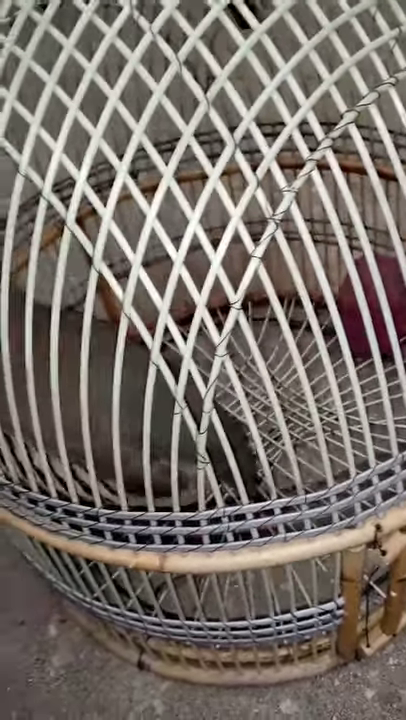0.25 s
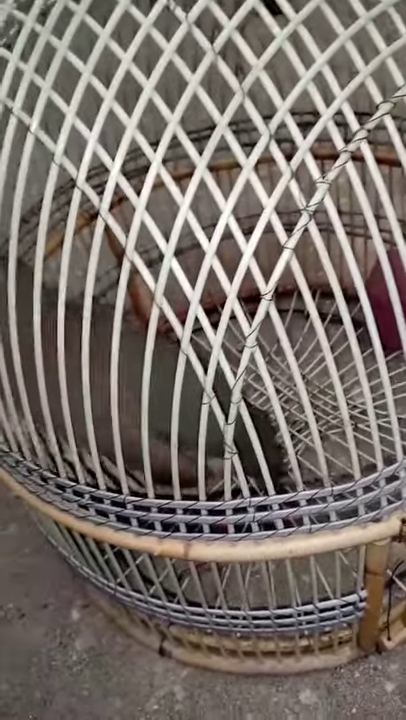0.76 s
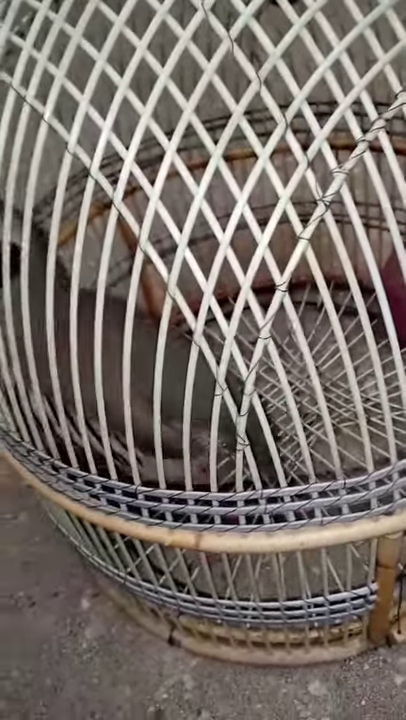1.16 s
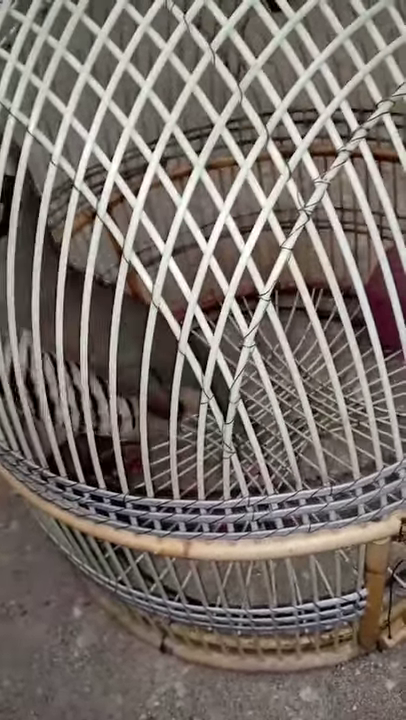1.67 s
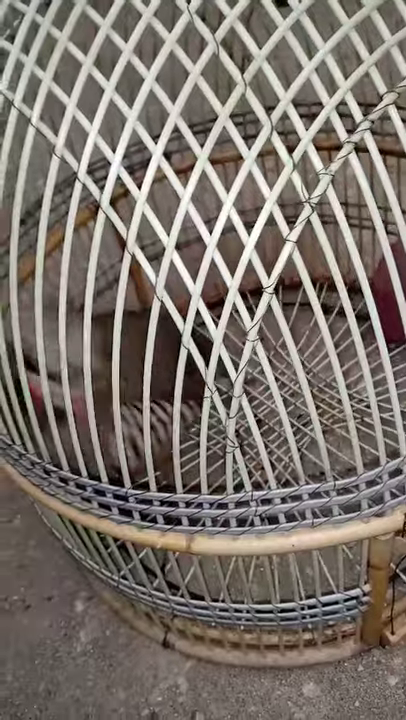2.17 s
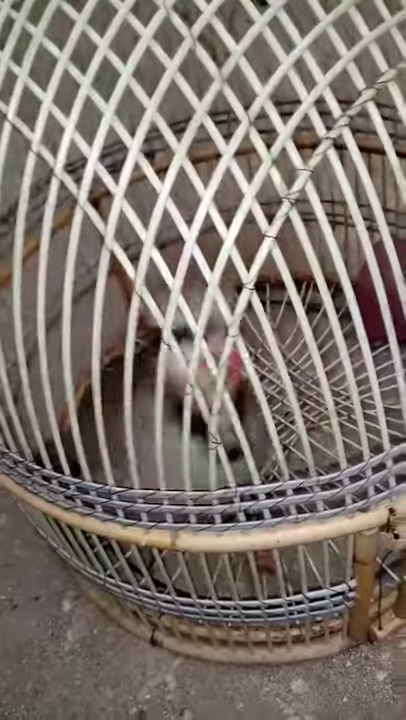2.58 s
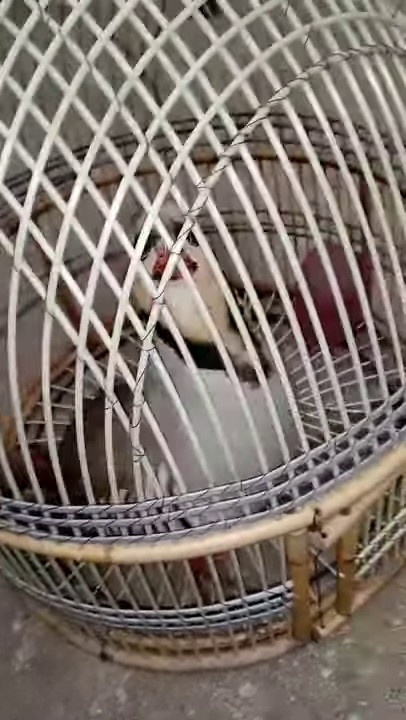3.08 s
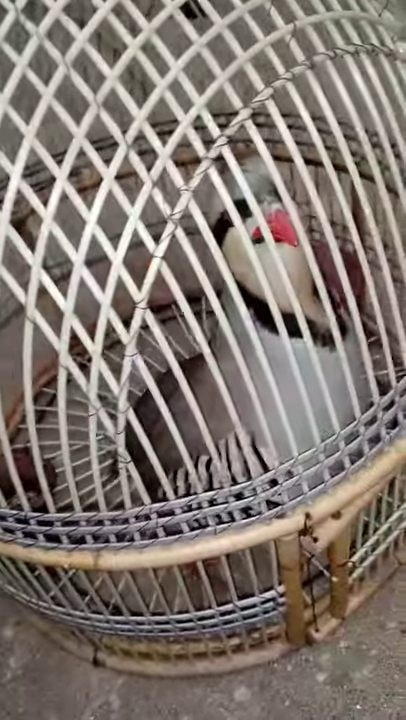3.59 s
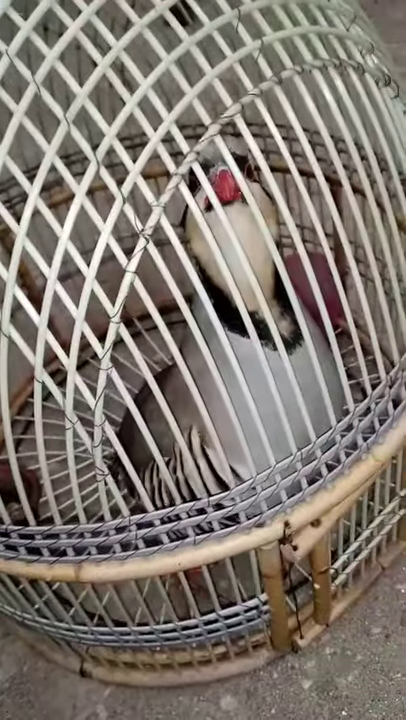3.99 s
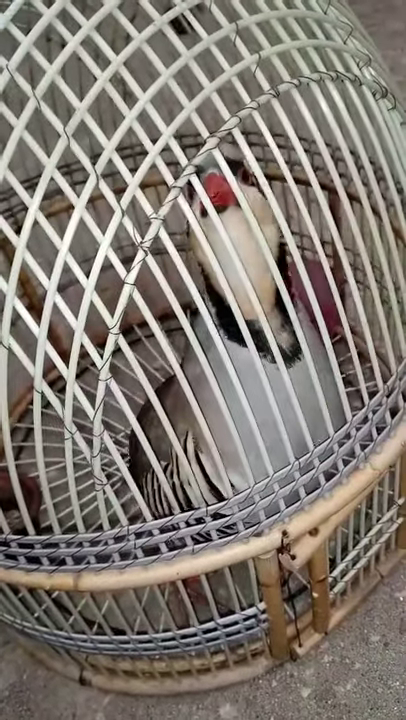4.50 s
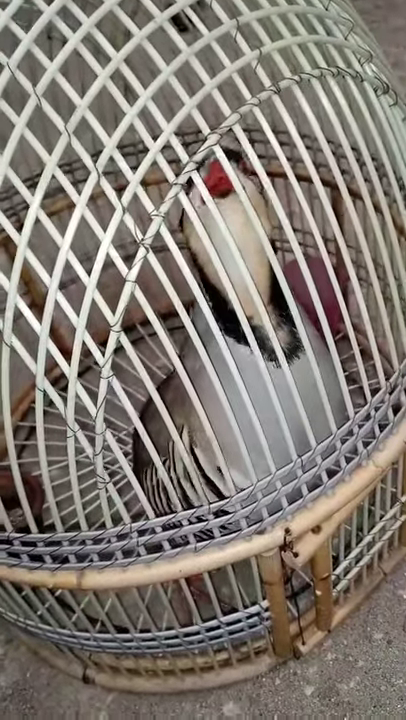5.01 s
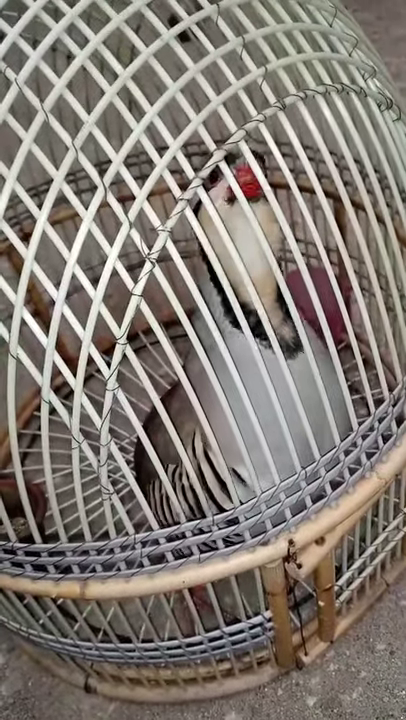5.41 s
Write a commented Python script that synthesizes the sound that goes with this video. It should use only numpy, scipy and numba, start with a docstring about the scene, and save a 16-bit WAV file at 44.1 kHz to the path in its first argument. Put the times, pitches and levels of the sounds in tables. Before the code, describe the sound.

A partridge in a wicker cage calls close to the microphone. Quick hoarse notes and piercing gliding squeals come first, with a short lull, then build into loud, bright paired cackles. After about three and a half seconds the calls become lower, more closed and throaty, in steady groups of two to four clucks with small gulps. Faint ticks on wicker, short wall echoes and a very quiet outdoor hum.

```python
"""An earlier call's echo dies away as a caged partridge begins runs of short hoarse notes, its beak wide.
Its voice membranes pulse at a restless rate through throat and beak resonances; among the notes, above all
the early ones, stand clear squeals: gliding tones with overtones. Noise bursts tick and rustle on the wicker.
Later the beak half shuts, and falling low tones, the gulps, close more of the notes. Decaying noise supplies
the wall echoes; filtered noise gives a background hum and murmur that sink in some long gaps between calls."""
import sys
import numpy as np
from scipy import signal
from scipy.fft import rfft, irfft
from scipy.io import wavfile
from scipy.ndimage import uniform_filter1d
from numba import njit

SR = 44100
rng = np.random.default_rng(int(sys.argv[2]) if len(sys.argv) > 2 else 0)


def to_wav(s):
    """Save 16-bit WAV."""
    ch = np.atleast_2d(s).T  # columns
    pcm = np.round(np.clip(ch, -1, 1) * 32767)  # PCM
    wavfile.write(sys.argv[1], SR, pcm.astype(np.int16))


N = 249165


def from_db(db):
    """Logarithmic level: decibels become an amplitude gain."""
    return 10 ** (np.asarray(db) / 20)


def rms_one(x):
    """Power normalisation: scale to unit rms."""
    return x / np.sqrt(np.mean(x ** 2) + 1e-20)


def colour(x, points):
    """Spectral shaping: weight each frequency by a curve through (hz, level_db) points."""
    hz, db = np.transpose(points)
    log_hz = np.log(np.maximum(np.arange(N // 2 + 1) * SR / N, 1))
    gain = from_db(np.interp(log_hz, np.log(hz), db, left=-90, right=-90))
    return irfft(rfft(x) * gain, N)


def drift(rate_hz):
    """Random fluctuation of unit rms: noise twice through a one-pole low-pass."""
    r = np.exp(-2 * np.pi * rate_hz / SR)
    return rms_one(signal.lfilter([1], [1, -2 * r, r * r], rng.standard_normal(N)))


def high_pass(x, hz):
    """Second-order high-pass filtering."""
    return signal.sosfilt(signal.butter(2, hz, "high", fs=SR, output="sos"), x)


def resonance(x, hz, width_hz):
    """Fixed resonance: a two-pole band-pass with gain 1 at its peak."""
    r = np.exp(-np.pi * width_hz / SR)
    zeros = np.array([1, 0, -1]) * (1 - r * r) / 2
    poles = [1, -2 * r * np.cos(2 * np.pi * hz / SR), r * r]
    return signal.lfilter(zeros, poles, x)


@njit
def gliding_filter(x, cosine, r):
    """Time-varying resonance: the pole angle moves sample by sample."""
    y = np.zeros(len(x))
    for i in range(2, len(x)):
        driven = (1 - r * r) / 2 * (x[i] - x[i - 2])
        y[i] = driven + 2 * r * cosine[i] * y[i - 1] - r * r * y[i - 2]
    return y


def gliding_resonance(x, hz, width_hz):
    """Moving resonance: a band-pass of constant width follows hz, scaled to unit rms."""
    return rms_one(gliding_filter(x, np.cos(2 * np.pi * hz / SR), np.exp(-np.pi * width_hz / SR)))


def evened(x):
    """Level equalisation over 7 ms, so that only the breath shapes a note."""
    return x / np.sqrt(uniform_filter1d(x ** 2, size=round(.007 * SR)) + 1e-12)


BUZZ_HZ, BUZZ_DEPTH = 244.1, 0.27   # a slower, uneven beat makes the flutter rasp; centre rate


def membranes(pitch_hz):
    """Irregular self-oscillation: one pulse a cycle, alternate pulses weakening by turns (period doubling)."""
    wander, jitter, uneven_db, breath = .09, .04, 2.2, .27
    phase = np.cumsum(pitch_hz * np.exp(wander * drift(75.0) + jitter * drift(500.0)) / SR)   # cycles
    cycle = np.floor(phase)
    closing = np.diff(cycle, prepend=0)
    halving = np.clip(0.32 + 2.4 * drift(41.0), 0, 1) * (cycle % 2)
    pulses = closing * (1 - halving) * from_db(uneven_db * np.clip(rng.standard_normal(N), -3, 1.2))
    buzz_phase = 2 * np.pi * np.cumsum(BUZZ_HZ * np.exp(.3 * drift(30.15))) / SR
    pulses = pulses * (1 + BUZZ_DEPTH * np.cos(buzz_phase))
    spray = rng.standard_normal(N) * (1 + np.cos(2 * np.pi * phase))   # breath noise escapes once a cycle
    return rms_one(pulses - pulses.mean()) + breath * spray


# throat resonances: hz, width_hz (before narrowing by 0.79), level_db
THROAT_RESONANCES = [(397, 830, -10), (755, 582, 1), (1279, 350, -1), (1521, 187, -1)]


def throat_sound(source, flutter_hz):
    """Cavity resonance: parallel modes of alternating sign, a side-branch loss and a mode tuned to the flutter."""
    throat = np.zeros(N)
    for k, (hz, width_hz, db) in enumerate(THROAT_RESONANCES):
        width_hz = 0.79 * width_hz
        mode = resonance(resonance(source, hz, width_hz), hz, width_hz)
        throat += from_db(db) * (-1) ** k * mode
    throat = throat - 0.93 * resonance(throat, 517, 400)   # a side pocket swallows this band
    return rms_one(throat) + 0.48 * gliding_resonance(throat, flutter_hz, 200)


# radiation spectrum of the wide open beak: hz, relative level_db per Hz
OPEN_BEAK_SPECTRUM = [(1000, -46), (1700, 0.5), (2610, -0.5), (3080, 4), (3610, -3), (5000, -8),
                      (6400, -20.5), (7190, -35), (8000, -35), (11200, -24.5), (14400, -36.5),
                      (15700, -52.5)]
# radiation spectrum of the nearly shut beak: hz, relative level_db per Hz
SHUT_BEAK_SPECTRUM = [(1180, -24), (2000, -7.5), (2870, -19.5), (3380, -1), (5000, -1), (5550, -26.5),
                      (6100, -7.5), (7000, -10.5), (8080, -25.5), (9280, -14), (10700, -29.5), (12500, -20),
                      (15700, -31.5)]
BEAK_OVER_FLUTTER, SHUT_BEAK_HZ = 1.448, 4280   # resonance: follows the flutter if open, stays if shut
AIR_HZ, AIR_SHARE = 4500, 0.84   # above this the beak passes rushing air rather than pulses
STRAIN_FROM_DB, STRAIN = -31, 2.1   # beak level where strain sets in; greatest share of treble it adds


def beak_sound(source, flutter_hz, opening, beak_db):
    """Radiation through an aperture: the opening blends two spectra and tunes a moving resonance."""
    source = source + AIR_SHARE * high_pass(rng.standard_normal(N) - source, AIR_HZ)
    wide = rms_one(colour(source, OPEN_BEAK_SPECTRUM))
    shut = rms_one(colour(source, SHUT_BEAK_SPECTRUM))
    beak = opening * wide + (1 - opening) * shut
    beak_hz = opening * BEAK_OVER_FLUTTER * flutter_hz + (1 - opening) * SHUT_BEAK_HZ
    beak = beak + (0.28 + 0.83 * opening) * gliding_resonance(beak, beak_hz, 500)
    effort = np.clip((beak_db - STRAIN_FROM_DB) / 10, 0, 1)   # the loudest notes turn brighter
    return beak + STRAIN * effort * high_pass(beak, 6500)


# hoarse notes: start_s, end_s, throat level_db, beak level_db, swell_db (early to late), flutter pitch_hz
HOARSE_NOTES = [(-0.02, -0.005, -26, -35.5, 14.5, 998), (0.089, 0.164, -43.5, -33, 2.5, 1890),
                (0.176, 0.225, -37.5, -41, 5, 1235), (0.294, 0.354, -34, -32.5, 6.5, 954.3),
                (0.395, 0.423, -31.5, -33, 10, 1454), (0.522, 0.545, -51.5, -81, 7, 800),
                (0.557, 0.576, -37.5, -28, 2, 1885), (0.59, 0.598, -53, -19, -12, 1883),
                (0.608, 0.651, -78.5, -25.5, -6, 2535), (0.652, 0.683, -30, -31.5, 2.5, 1451),
                (0.895, 0.922, -36.5, -48.5, -0.5, 1047), (1.044, 1.083, -43.5, -51, 14, 862),
                (1.081, 1.102, -40.5, -25, 2.5, 1817), (1.116, 1.143, -47, -53.5, 4, 1312),
                (1.358, 1.389, -43.5, -55, -5, 1244), (1.41, 1.49, -50.5, -89, 6, 799.3),
                (1.565, 1.603, -60, -36, -3, 1527), (1.607, 1.64, -71, -32, -7, 1902),
                (1.656, 1.683, -31.5, -30, 3.5, 1459), (1.742, 1.775, -31.5, -35.5, 9.5, 1364),
                (1.837, 1.865, -30, -29.5, 14, 1499), (1.868, 1.905, -25.5, -24, 5, 1455),
                (2.011, 2.039, -33, -33, 28, 1419), (2.042, 2.089, -44, -21, -3, 1913),
                (2.085, 2.116, -34.5, -24.5, 11, 1880), (2.232, 2.25, -33, -24, 11, 1510),
                (2.269, 2.287, -75, -20.5, -21.5, 1887), (2.298, 2.313, -48.5, -21.5, -4, 1846),
                (2.321, 2.349, -50, -30, 7, 1858), (2.349, 2.396, -31, -19.5, 4.5, 1606),
                (2.493, 2.528, -35, -21.5, -1, 1868), (2.525, 2.582, -33.5, -20, -3, 1894),
                (2.67, 2.703, -30.5, -22.5, 7.5, 1703), (2.705, 2.742, -32, -18.5, 4.5, 1896),
                (2.812, 2.86, -50, -80, 9, 863), (2.932, 2.954, -26.5, -36, 5, 895),
                (3.042, 3.06, -37.5, -22.5, -9.5, 1631), (3.058, 3.074, -50, -25.5, -14, 1811),
                (3.081, 3.147, -73, -34.5, 13, 1688), (3.154, 3.194, -28, -27, 3, 1278),
                (3.292, 3.351, -48.5, -85, 8.5, 974), (3.38, 3.403, -30.5, -39.5, 13, 844.6),
                (3.457, 3.493, -35.5, -64, -8.5, 761.5), (3.663, 3.712, -51.5, -83, 1.5, 676),
                (3.727, 3.774, -33.5, -55, 14.5, 846), (3.771, 3.816, -36, -53, 13, 815),
                (3.819, 3.851, -22, -47.5, -8, 1163), (4.05, 4.058, -21, -70, 4, 1175),
                (4.057, 4.081, -26, -41.5, 8.5, 785.7), (4.097, 4.138, -30.5, -54.5, 6, 798.6),
                (4.135, 4.169, -19, -38, 1, 1216), (4.373, 4.389, -24.5, -68.5, 6.5, 1205),
                (4.386, 4.456, -28, -39.5, 1.5, 1020), (4.453, 4.482, -17.5, -32.5, 3, 1248),
                (4.613, 4.662, -37, -64.5, 10, 1158), (4.662, 4.715, -28, -46.5, 3, 1168),
                (4.716, 4.773, -19, -31.5, 1, 1221), (4.903, 4.937, -35.5, -76, 12.5, 1214),
                (4.945, 4.988, -25.5, -40, 5.5, 1212), (4.988, 5.026, -29.5, -38, -4, 937),
                (5.03, 5.066, -23, -32.5, -8, 1202), (5.074, 5.162, -41, -64.5, 10, 1200),
                (5.166, 5.23, -31.5, -53, -2, 1249), (5.237, 5.261, -21.5, -39.5, 11, 1249),
                (5.259, 5.293, -20, -33.5, -3.5, 1159), (5.422, 5.45, -24, -38.5, 14.5, 1214),
                (5.466, 5.508, -39, -65, -2.5, 1222), (5.516, 5.546, -23.5, -30.5, 7, 1247),
                (5.536, 5.572, -18.5, -32, -4.5, 1225), (5.592, 5.656, -30, -47.5, 33, 1191)]
# low tones at the close of a note: time_s, peak level_db
GULP_EVENTS = [(0.188, -39), (2.126, -48.5), (2.404, -43.5), (2.587, -50), (2.749, -47), (3.194, -42.5),
               (3.493, -45.5), (3.841, -35.5), (4.167, -37.5), (4.488, -38.5), (4.772, -39.5), (5.051, -38),
               (5.284, -36.5), (5.568, -41)]
ATTACK_S, RELEASE_S = 0.015, 0.044
BEAK_WIDENS_DB, BEAK_CLOSES_DB = 10, 5   # the beak gains on the throat in a note, loses before a gulp


def breath_power():
    """Energy envelopes: each note's breath swells and fades, giving the power of throat and of beak."""
    power, airflow = np.zeros((2, N)), np.zeros(N)
    for start, end, throat_db, beak_db, swell_db, _ in HOARSE_NOTES:
        first = round((start - ATTACK_S / 2) * SR)
        last = min(round((end + RELEASE_S / 2) * SR), N)
        at = np.arange(first, last)
        edge = np.minimum((at - at[0]) / ATTACK_S, (at[-1] - at) / RELEASE_S) / SR
        at, edge = at[at >= 0], edge[at >= 0]
        breath = np.sin(np.pi / 2 * np.clip(edge, 0, 1)) ** 4
        progress = np.clip(2 * (at / SR - start) / (end - start) - 1, -.5, .5)   # early -.5, late +.5
        closing = any(abs(s - end) < .02 for s, db in GULP_EVENTS)
        widening_db = -BEAK_CLOSES_DB if closing else BEAK_WIDENS_DB
        # twice the decibels: power, not amplitude
        power[0, at] += breath * from_db(2 * (throat_db + progress * (swell_db - widening_db / 2)))
        power[1, at] += breath * from_db(2 * (beak_db + progress * (swell_db + widening_db / 2)))
        airflow[at] += breath
    power[1] *= np.minimum(airflow, 1)   # the beak sound rises later than the throat and fades sooner
    return power


HEAD_UP_S, LEAST_OPENING = 3.6, 0.91   # until the bird lifts its head the beak never quite shuts


def hoarse_notes():
    """Source and filter: one flutter excites throat and beak, and the breath sets their levels."""
    t, notes = np.arange(N) / SR, np.array(HOARSE_NOTES)
    start, end, throat_db, beak_db, _, pitch_hz = notes.T
    middle = (start + end) / 2
    reach = (end - start) * .44   # each note holds its pitch, then moves to the next
    corners = np.ravel([middle - reach, middle + reach], "F")
    flutter_hz = np.interp(t, corners, np.repeat(pitch_hz, 2))
    # the weaker the beak sounds against the throat, the nearer it is shut
    opening = np.clip(np.interp(t, middle, beak_db - throat_db) / 6 + 1.7, 0, 1)
    opening = np.where(t < HEAD_UP_S, np.maximum(opening, LEAST_OPENING), opening)
    for s, db in GULP_EVENTS:   # the pitch sags as the throat closes
        flutter_hz = flutter_hz * np.interp(t - s, [-.014, .012, .03, .04], [1, .8, .8, 1])
    source = membranes(flutter_hz)
    throat = throat_sound(source, flutter_hz)
    beak = beak_sound(source, flutter_hz, opening, np.interp(t, middle, beak_db))
    throat_power, beak_power = breath_power()
    tremble = from_db(1.5 * drift(70.0))
    voice = tremble * (np.sqrt(throat_power) * evened(throat) + np.sqrt(beak_power) * evened(beak))
    return high_pass(voice, 200)   # the voice carries nothing below about 200 Hz


# clear squeals: level_db, then a pitch path of (time_s, pitch_hz)
SQUEAL_PATHS = [ (-37, [(.079, 862), (.089, 1140)]), (-27.5, [(.095, 2430), (.108, 2920), (.119, 2450)]),
                (-22.5, [(.114, 3560), (.122, 4110)]), (-23, [(.123, 3060), (.132, 4120)]),
                (-28, [(.111, 2660), (.121, 1950)]), (-25, [(.138, 2806), (.146, 2347), (.158, 2960)]),
                (-36, [(.309, 797), (.325, 1013)]), (-26, [(.328, 2503), (.338, 2500)]),
                (-37.5, [(.556, 1287), (.569, 1700)]), (-29.5, [(.563, 2070), (.573, 2877)]),
                (-32.5, [(.568, 3600), (.574, 3930), (.579, 3540)]), (-36, [(.586, 1479), (.597, 2194)]),
                (-27.5, [(.641, 3710), (.649, 2407)]), (-38.5, [(.66, 1357), (.671, 1450)]),
                (-33.5, [(.097, 3400), (.106, 3940)]), (-21.5, [(.594, 2856), (.606, 4450)]),
                (-25, [(.613, 2860), (.621, 2680), (.628, 3912), (.637, 4675)]), (-40.5, [(1.05, 1415),
                (1.06, 1681)]), (-44, [(1.058, 2562), (1.072, 2750)]), (-38.5, [(1.061, 1730),
                (1.074, 1770)]), (-35, [(1.073, 1636), (1.096, 1468)]), (-44, [(1.118, 1223),
                (1.131, 1455)]), (-34, [(1.366, 1308), (1.39, 1193)]), (-42.5, [(1.405, 1024),
                (1.452, 824)]), (-35.5, [(1.556, 1240), (1.57, 1535), (1.585, 1500)]), (-28, [(1.582, 1425),
                (1.59, 2035), (1.596, 2200)]), (-28.5, [(1.61, 1490), (1.618, 2040), (1.633, 2045)]),
                (-16, [(1.617, 2890), (1.626, 3410)]), (-24, [(1.874, 2280), (1.89, 1993)]),
                (-36, [(2.012, 1393), (2.036, 1494)]), (-22, [(2.047, 3426), (2.062, 3000)]),
                (-20.5, [(2.066, 3150), (2.074, 3380)]), (-35, [(2.076, 3008), (2.085, 2594)]),
                (-26, [(2.105, 3307), (2.118, 3078)]), (-28.5, [(2.262, 1384), (2.272, 1846)]),
                (-20, [(2.272, 3020), (2.277, 3190), (2.281, 3730), (2.29, 3645), (2.296, 3024)]),
                (-24.5, [(2.30, 1380), (2.312, 1890)]), (-14.5, [(2.306, 2927), (2.315, 3340)]),
                (-23.5, [(2.315, 3910), (2.322, 3854), (2.333, 3460), (2.341, 3540), (2.346, 2960),
                (2.352, 1980)]), (-15.5, [(2.351, 3030), (2.362, 3000)]), (-27.5, [(2.372, 3170),
                (2.382, 3080)]), (-21, [(2.515, 2264), (2.524, 1980)]), (-20.5, [(2.526, 3220),
                (2.537, 2950)]), (-29.5, [(2.693, 1688), (2.704, 1766)]), (-19.5, [(2.70, 2440),
                (2.707, 2744), (2.713, 2410)]), (-33.5, [(2.718, 958), (2.742, 875)]),
                (-27.5, [(3.05, 1840), (3.058, 1530), (3.064, 1890)]), (-16.5, [(3.061, 2470),
                (3.066, 3020), (3.072, 3904), (3.089, 3690), (3.092, 2983)]), (-20.5, [(3.09, 3000),
                (3.095, 2494), (3.101, 2767), (3.104, 3288)]), (-14, [(3.101, 3076), (3.106, 3720),
                (3.115, 3840)]), (-17.5, [(3.114, 3964), (3.127, 3580)]), (-25, [(3.126, 3280),
                (3.13, 2450), (3.134, 1620), (3.139, 1670), (3.143, 2886)]), (-24, [(3.144, 3680),
                (3.149, 3409), (3.154, 2216), (3.161, 2000)]), (-27, [(4.94, 1283), (4.958, 1154)]),
                (-18, [(5.05, 1262), (5.064, 1066)]), ]
# octave overtone, before the cuts for soft or shut-beak squeals: pitch_hz, level_db above the tone
OCTAVE_OVERTONE = [(900, 2.), (1550, 2.5), (2000, -4), (2700, -22), (3500, -42)]
# lines between the harmonics, as every second cycle is weaker; before the shut-beak cut and a random drift:
# pitch_hz, level_db above the tone
HALF_PITCH_LINES = [(1200, -17), (1700, -17), (2300, -16.5), (3000, -21), (3600, -38)]
SQUEAL_BREATH_DB = -19   # before the shut-beak cut
SQUEAL_DB_PER_OCTAVE, SQUEAL_SAG_DB_PER_S = -1, 152.5   # softer as it climbs; fading as breath runs out


def squeals():
    """Periodic vibration: a gliding tone with an octave, half-pitch lines and a bright breath."""
    out, flutter = np.zeros(N), from_db(1.2 * drift(160.0))
    bright = [point for point in OPEN_BEAK_SPECTRUM if point[0] > 4000]
    breath = rms_one(colour(rng.standard_normal(N), bright))
    halving = from_db(3 * drift(80.0))
    for db, path in SQUEAL_PATHS:
        s, hz = np.transpose(path)
        at = np.arange(round(s[0] * SR), round(s[-1] * SR))
        t = at / SR
        pitch = uniform_filter1d(np.interp(t, s, hz), size=round(.003 * SR), mode="nearest")
        phase = 2 * np.pi * np.cumsum(pitch) / SR
        fade = np.clip(np.minimum(t - s[0], s[-1] - t) / .003, 0, 1)   # 3 ms at each end
        climb_db = SQUEAL_DB_PER_OCTAVE * np.log2(pitch / pitch.mean())
        level_db = db + climb_db - SQUEAL_SAG_DB_PER_S * (t - t.mean())
        shut_db = -26 if hz[-1] < hz[0] < 1350 else 0   # low sinking ones are hummed through a shut beak
        soft_db = 6 * np.minimum(db + 36, 0) + shut_db   # soft squeals are purer
        octave = from_db(np.interp(pitch, *np.transpose(OCTAVE_OVERTONE)) + soft_db)
        tone = np.sin(phase) + octave * np.sin(2 * phase)
        between = np.sin(3 * phase / 2) + .5 * np.sin(phase / 2)
        between = between + .5 * np.sin(5 * phase / 2) * (pitch < 2200)
        between_gain = from_db(np.interp(pitch, *np.transpose(HALF_PITCH_LINES)) + shut_db)
        tone = tone + between_gain * halving[at] * between
        air = from_db(SQUEAL_BREATH_DB + shut_db) * breath[at]
        out[at] += fade * from_db(level_db) * (np.sqrt(2) * tone + air)
    return out * flutter


GULP_HZ, GULP_FALL_HZ_PER_S, GULP_RISE_S, GULP_T60_S = 385.6, 4200, .012, 0.057


def gulps():
    """Damped oscillation: as the throat closes, a low tone swells, sinks in pitch and dies."""
    out, t = np.zeros(N), np.arange(round(.06 * SR)) / SR
    rise = np.sin(np.pi / 2 * np.minimum(t / GULP_RISE_S, 1)) ** 2
    decay = from_db(-60 * np.maximum(t - GULP_RISE_S, 0) / GULP_T60_S)
    tone = np.sin(2 * np.pi * (GULP_HZ * t - GULP_FALL_HZ_PER_S * t ** 2 / 2))
    starts = [round((s - GULP_RISE_S / 2) * SR) for s, db in GULP_EVENTS]
    out[starts] = from_db([db for s, db in GULP_EVENTS])
    return signal.fftconvolve(out, rise * decay * tone)[:N]


# claws and feathers on the wicker: time_s, nominal peak level_db
WICKER_TICKS = [(1.0161, -49.5), (1.0323, -51), (1.4498, -52), (1.461, -44.5), (1.505, -35.5),
                (2.6629, -37), (3.26, -56.5), (3.2823, -62), (3.329, -61.5), (5.383, -61)]
# spectrum of touched wicker: hz, relative level_db per Hz
WICKER_SPECTRUM = [(290, -48.5), (500, 6.5), (988, -12), (1360, -27.5), (1480, -18), (7420, 1.5),
                   (16000, -16.5)]
CREST_DB = 9   # peak of a noise burst above its rms


def wicker():
    """Impact noise: each touch is a short bright burst with a longer brushing decay."""
    out, t = np.zeros(N), np.arange(round(.08 * SR)) / SR
    out[[round(s * SR) for s, db in WICKER_TICKS]] = from_db([db - CREST_DB for s, db in WICKER_TICKS])
    shape = (1 - np.exp(-t / 0.00034)) * (np.exp(-t / 0.0051) + 2.6 * np.exp(-t / 0.011))
    burst = signal.fftconvolve(out, shape)[:N]
    return burst * rms_one(colour(rng.standard_normal(N), WICKER_SPECTRUM)) * from_db(1.3 * drift(200.0))


# feathers brush the wicker: start_s, end_s, nominal rms level_db
FEATHER_RUSTLES = [(0.842, 0.881, -63), (0.966, 0.997, -58.5), (1, 1.015, -51.5), (2.183, 2.22, -50.5)]


def rustles():
    """Friction noise: feathers drag along the wicker with a soft uneven hiss."""
    t, level = np.arange(N) / SR, np.zeros(N)
    for start, end, db in FEATHER_RUSTLES:
        level += from_db(db) * np.clip(np.minimum(t - start, end + .008 - t) / .008, 0, 1)
    return level * rms_one(colour(rng.standard_normal(N), WICKER_SPECTRUM)) * from_db(3.2 * drift(119.5))


WALL_CUT_HZ, YARD_DB, YARD_T60_S = 13000, -24, .38
LOW_ECHO_HZ, LOW_ECHO_T60_S, LOW_ECHO_DB = 1473, 0.46, 0.5   # lower tones ring on longer


def yard(x):
    """Reverberation: convolution with decaying noise, duller than the direct sound and 8 ms behind it."""
    t = np.arange(round(.6 * SR)) / SR
    low = signal.lfilter(*signal.butter(2, LOW_ECHO_HZ, fs=SR), rng.standard_normal(len(t)))
    echoes = rng.standard_normal(len(t)) * from_db(-60 * t / YARD_T60_S)
    echoes = (echoes + low * from_db(LOW_ECHO_DB - 60 * t / LOW_ECHO_T60_S)) * (t > .008)
    echoes = signal.lfilter(*signal.butter(1, WALL_CUT_HZ, fs=SR), echoes)
    return signal.fftconvolve(x, echoes / np.sqrt(np.sum(echoes ** 2)))[:N]


EARLIER_CALL_DB = -64.5   # level at the start


def earlier_echo():
    """Exponential decay: the walls still return a call that has just ended."""
    decay = from_db(EARLIER_CALL_DB - 60 * np.arange(N) / SR / YARD_T60_S)
    return rms_one(colour(rng.standard_normal(N), SHUT_BEAK_SPECTRUM)) * decay


# spectrum of the hum: hz, relative level_db per Hz
HUM_SPECTRUM = [(25, -10), (60, 1), (100, 5), (200, 2.5), (320, -21.5)]
# spectrum of the murmur: hz, relative level_db per Hz
MURMUR_SPECTRUM = [(200, -8), (350, -2), (750, -2.5), (1300, -11), (1800, -24), (2400, -53.5)]
# background levels, which sink in some long gaps between calls; the murmur takes in some lingering low echo:
# time_s, hum level_db, murmur level_db
BACKGROUND_LEVELS = [(0.0, -60.5, -61), (.35, -61, -56.5), (1.08, -61.5, -74.5), (1.25, -70, -80),
                     (1.38, -69, -88), (1.5, -64.5, -62), (3.3, -68, -58), (3.6, -61, -67),
                     (4.35, -67, -68.5), (5.65, -64, -51)]
HISS_DB = -83.5


def murmur():
    """Ambient noise: hum and murmur that sink in some long gaps between calls, over a trace of hiss."""
    s, hum_db, murmur_db = np.transpose(BACKGROUND_LEVELS)
    t = np.arange(N) / SR
    hum_gain = from_db(np.interp(t, s, hum_db) + 2.5 * drift(24.0))   # the drift makes it patchy
    hum = rms_one(colour(rng.standard_normal(N), HUM_SPECTRUM)) * hum_gain
    far_gain = from_db(np.interp(t, s, murmur_db) + 2.1 * drift(8.7))
    far = rms_one(colour(rng.standard_normal(N), MURMUR_SPECTRUM)) * far_gain
    hiss_gain = from_db(HISS_DB + 1.3 * drift(8.3))
    hiss = rms_one(colour(rng.standard_normal(N), WICKER_SPECTRUM)) * hiss_gain
    return hum + far + hiss


def scene():
    """Superposition: bird and cage, their echoes, the background."""
    cage = hoarse_notes() + squeals() + gulps() + wicker() + rustles()
    return (cage + from_db(YARD_DB) * yard(cage) + earlier_echo() + murmur())[None]


CUTOFF_HZ = 15900


def record(dry):
    """Saturation and band limiting: peaks are rounded, the deepest bass and the top are cut."""
    rounded = .55 * np.tanh(dry / .55)
    rounded = high_pass(rounded, 45)
    return signal.sosfilt(signal.ellip(10, .5, 70, CUTOFF_HZ, fs=SR, output="sos"), rounded)


dry = scene()
out = record(dry)
to_wav(out)
```